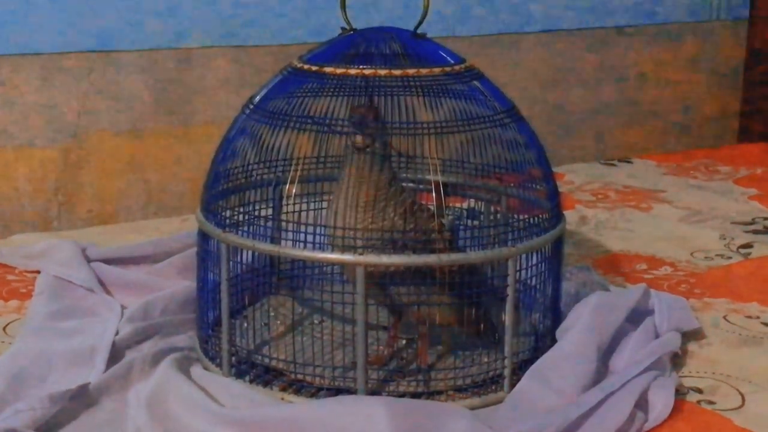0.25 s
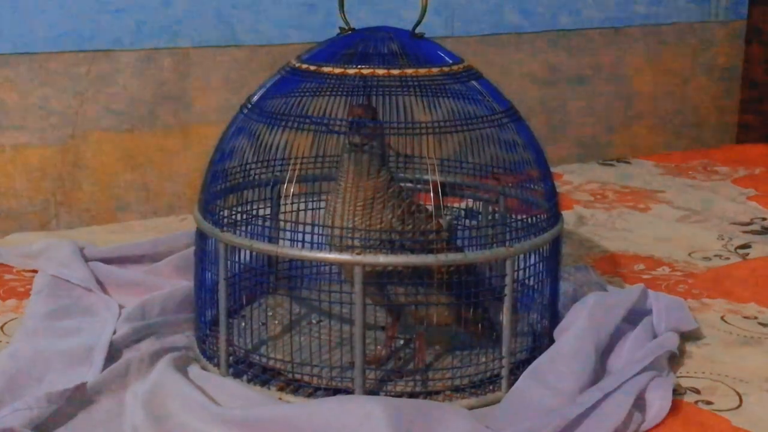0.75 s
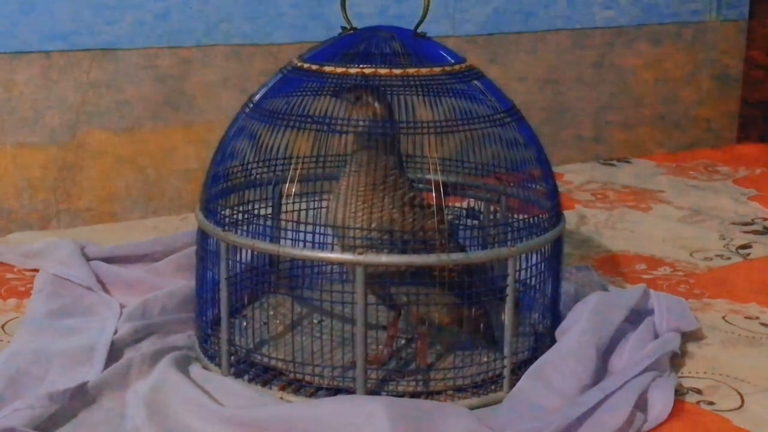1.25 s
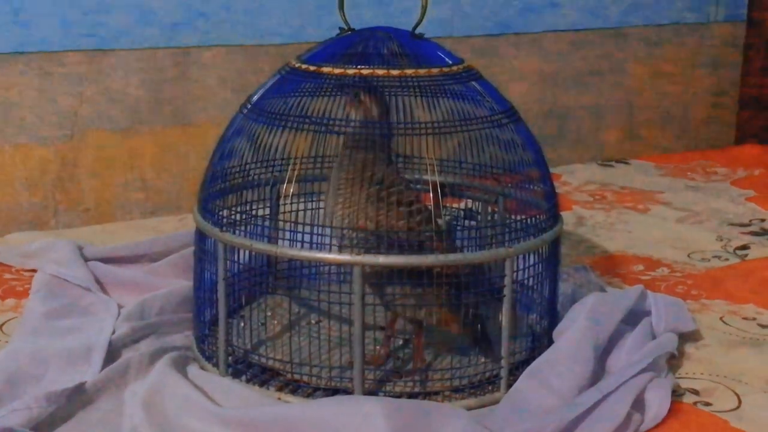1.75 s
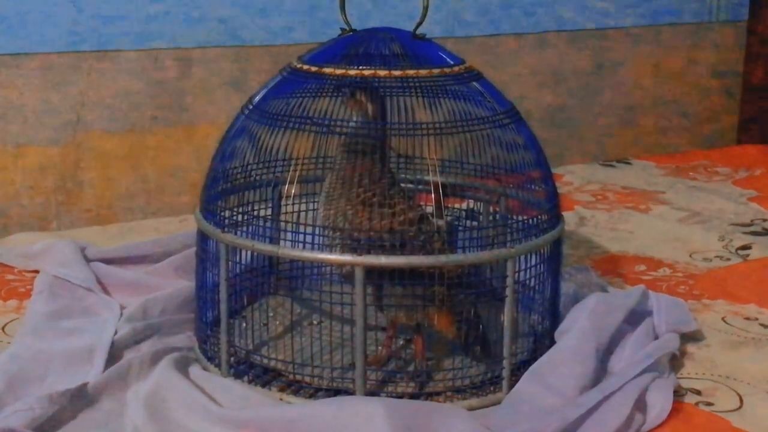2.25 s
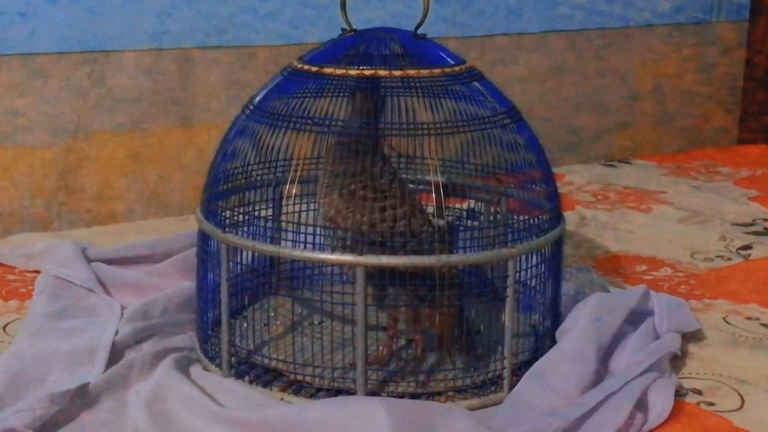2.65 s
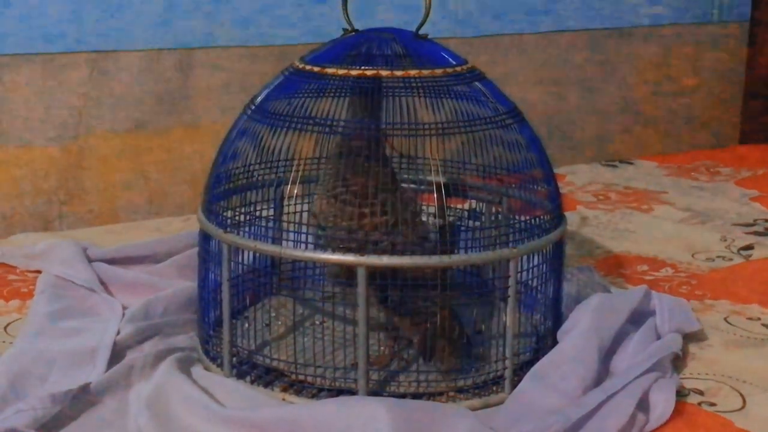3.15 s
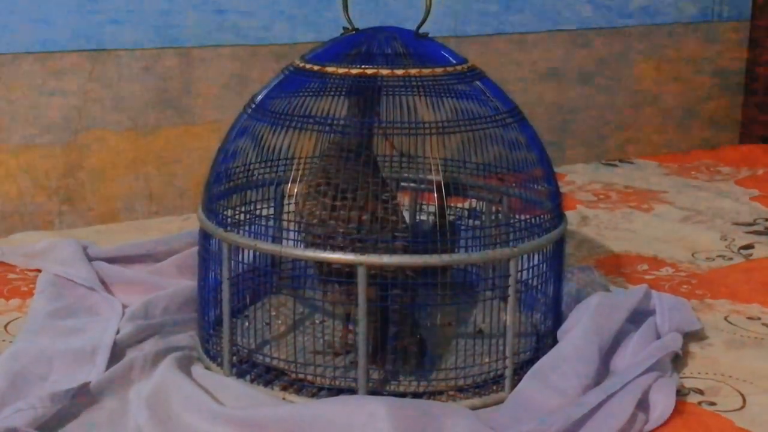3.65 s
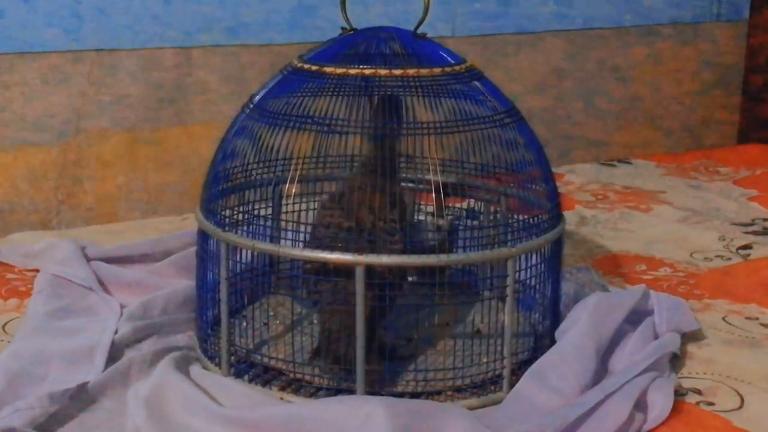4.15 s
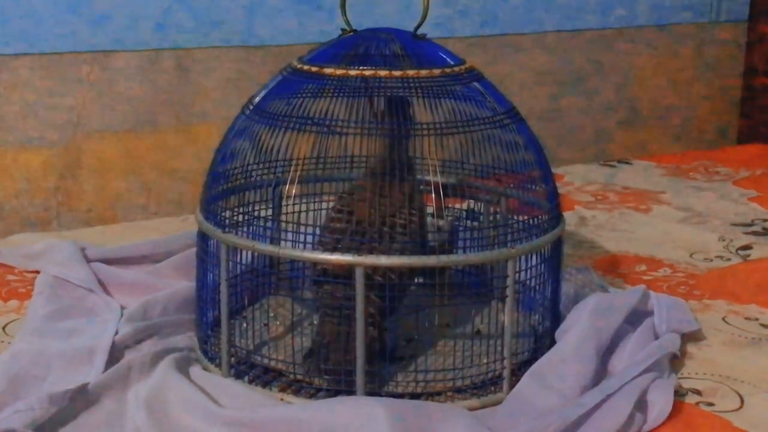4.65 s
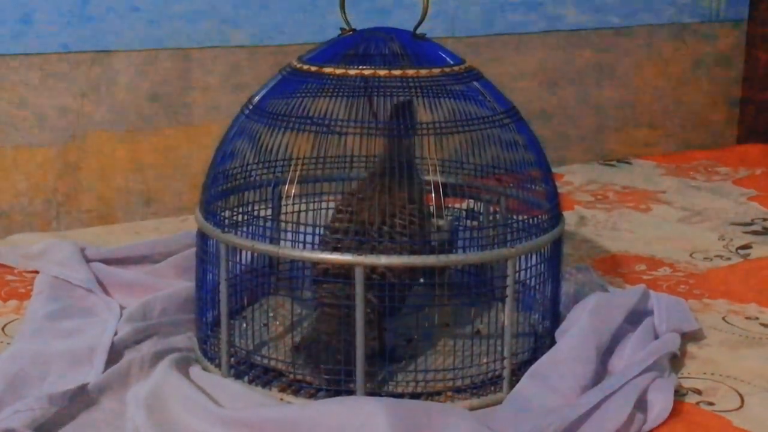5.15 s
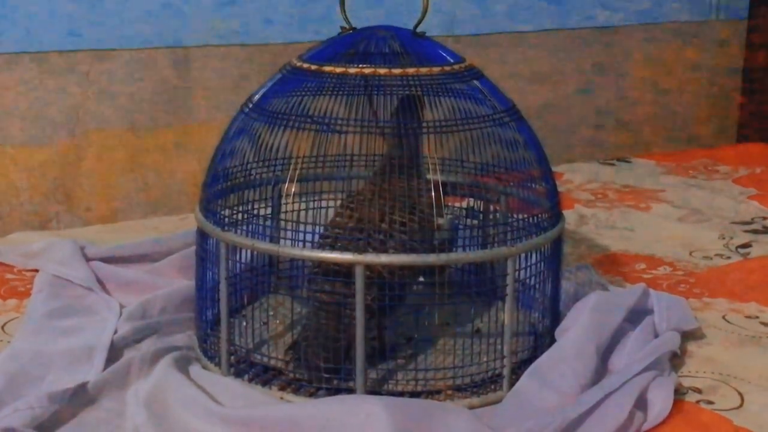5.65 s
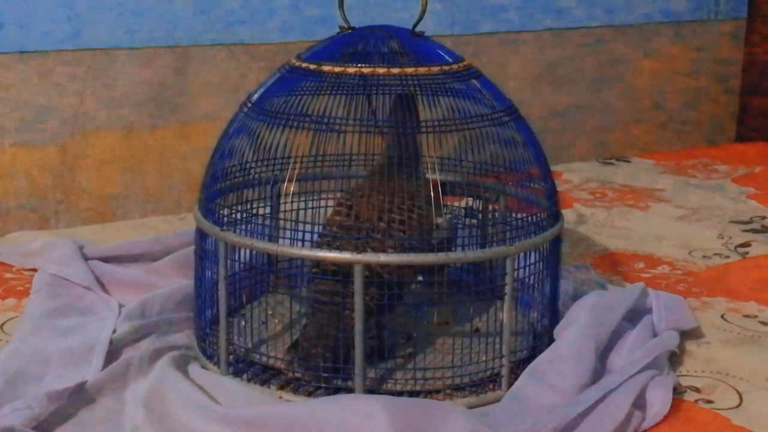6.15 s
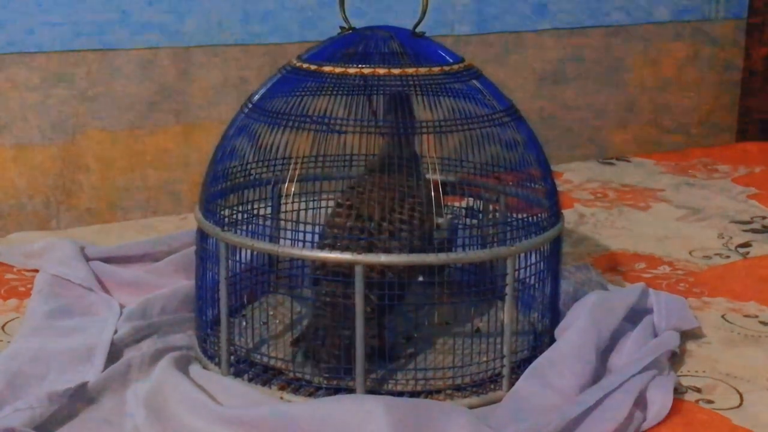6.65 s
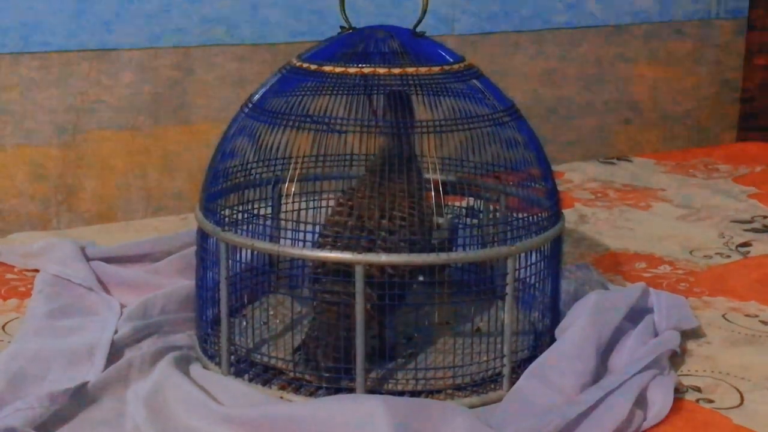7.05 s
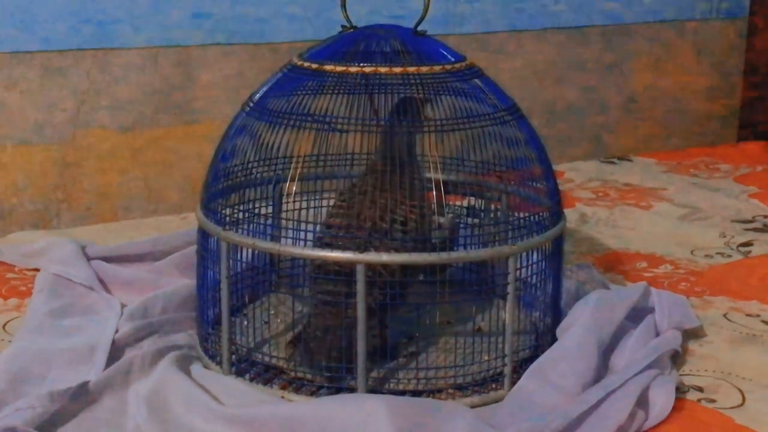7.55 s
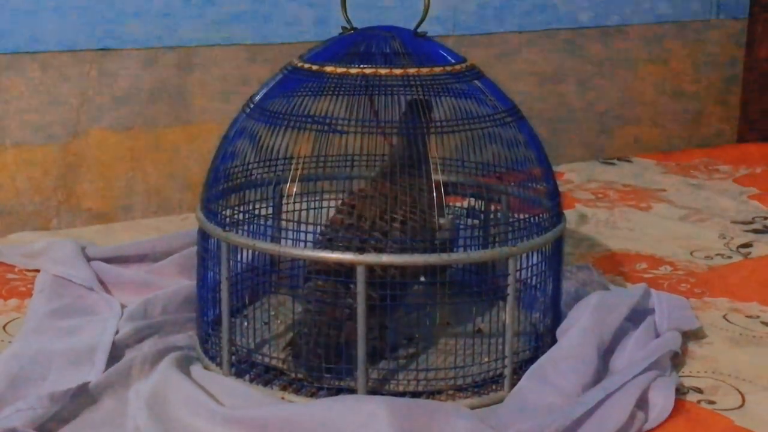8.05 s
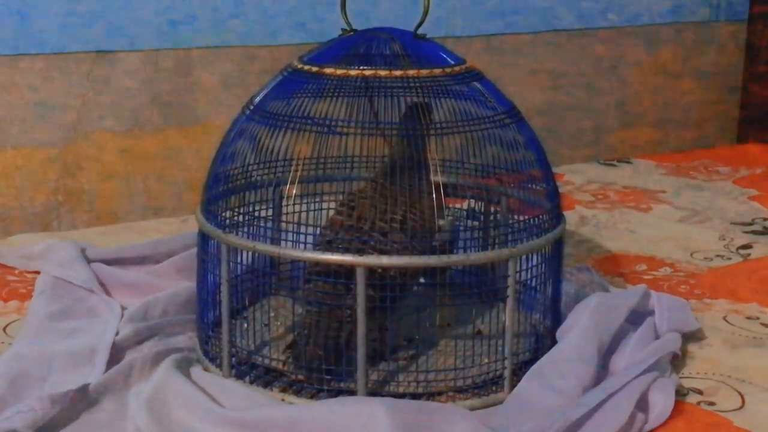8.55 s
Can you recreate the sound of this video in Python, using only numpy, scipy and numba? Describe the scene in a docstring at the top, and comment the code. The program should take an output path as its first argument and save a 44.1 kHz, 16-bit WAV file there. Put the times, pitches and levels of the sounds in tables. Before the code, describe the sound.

Over soft room noise and a faint low hum, a bird in a cage clucks harshly a few times, then starts a run of short, piercing cries, a little under a second apart. Each one rasps, whistles and falls, usually with two clucks after it and sometimes a thin squeak before. The opening is loudest, and the level steps down during the second cry. The calls sound fairly close and ring off hard walls.

```python
"""A caged gray francolin calls in a bare, echoing room, over a faint low hum and soft room air.
First come two harsh clucks with a thin rising squeak between them, and a faint third cluck.
Nine shrill cries follow: each a rasp that breaks into a pure whistle, rasps again and slides down.
The whole sound steps down in level during the second cry. All cries but that one are followed by
two clucks, and a squeak leads into some of them."""
import sys
import numpy as np
from scipy import signal
from scipy.fft import rfft, irfft
from scipy.io import wavfile
from numba import njit

SR = 44100
rng = np.random.default_rng(int(sys.argv[2]) if len(sys.argv) > 2 else 0)


def log_audio(samples):
    """Write samples as a 16-bit WAV file to the path given in sys.argv[1]."""
    # one column per channel
    frames = np.atleast_2d(samples).T
    # limit to full scale, then quantise
    limited = np.clip(frames, -1, 1)
    pcm = np.round(limited * 32767).astype(np.int16)
    wavfile.write(sys.argv[1], SR, pcm)


N = 388962
WHISTLE_DELAY_S, SLIDE_DELAY_S, CRY_LENGTH_S = .037, .081, .156  # from the start of a cry


def undb(db):
    """Decibels to gain."""
    return 10 ** (np.asarray(db) / 20)


def unit(x):
    """Scale to rms 1."""
    return x / np.sqrt(np.mean(x ** 2) + 1e-18)


def on_log(table, hz):
    """Read (Hz, value) points on a log-frequency axis."""
    key, value = np.transpose(table)
    return np.interp(np.log(np.maximum(hz, 1)), np.log(key), value)


def colour(x, spectrum):
    """Filter by (Hz, dB) points."""
    return irfft(rfft(x) * undb(on_log(spectrum, np.fft.rfftfreq(len(x), 1 / SR))), len(x))


def clock(length_s):
    """Sample times of one note."""
    return np.arange(int(length_s * SR)) / SR


def wander(t, rate_hz):
    """Random values joined by lines."""
    return np.interp(t * rate_hz, np.arange(4096), rng.standard_normal(4096))


def swell(t, attack_s):
    """Gain that rises quickly to 1."""
    return 1 - np.exp(-2 * t / attack_s)


def fade(t, edge_s):
    """Soft start and end of a note."""
    return np.sin(np.pi / 2 * np.clip(np.minimum(t, t[-1] - t) / edge_s, 0, 1)) ** 2


def turn(hz):
    """Oscillator phase in radians."""
    return 2 * np.pi * np.cumsum(hz) / SR


def add(track, start_s, x):
    """Mix a note into a track."""
    i = int(start_s * SR)
    track[i:i + len(x)] += x[:len(track) - i]


@njit
def resonate(x, hz, width_hz):
    """State-variable band-pass with a moving centre."""
    y, band_state, low_state = np.empty(len(x)), 0., 0.
    for i in range(len(x)):
        g, damping = np.tan(np.pi * hz[i] / SR), width_hz / hz[i]
        band = (band_state + g * (x[i] - low_state)) / (1 + g * (g + damping))
        band_state, low_state = 2 * band - band_state, low_state + 2 * g * band
        y[i] = damping * band
    return y


def hum():
    """Low tones that waver, slowly swell and sink, and step down once."""
    # Each row: frequency in Hz, relative level in dB.
    partials = [(75.4, -64.5), (129.2, -62), (172.3, -65.5), (366.1, -77.5)]
    # Before and after the step. Each row: time in seconds, level in dB before trim.
    early = [(0.0, -61), (1.39, -50.5), (1.82, -64.5), (2.28, -60.5), (2.42, -58)]
    late = [(2.47, -72.5), (5.31, -70.5), (6.28, -75), (6.98, -69.5), (8.8, -68)]
    trim_db = -2
    t = np.arange(N) / SR
    tones = sum(undb(db + 2 * wander(t, 6)) * np.sin(turn(hz * (1 + .028 * wander(t, 13))))
                for hz, db in partials)
    times_s, level_db = np.transpose(early + late)
    return unit(tones) * undb(np.interp(t, times_s, level_db) + trim_db)


def air():
    """Soft room air: low noise with a drifting level."""
    # Each row: frequency in Hz, relative level in dB.
    spectrum = [(20, -25.5), (45, -10.5), (75, 0), (130, -2.5), (195, -3.5), (270, -11.5), (380, -8.5),
                (600, -18), (1500, -24), (3000, -30), (5000, -35), (7000, -30), (9000, -41), (15000, -32.5)]
    return unit(colour(rng.standard_normal(N), spectrum)) * undb(-54 + wander(np.arange(N) / SR, 5))


def buzz(t, hz, jitter, odd_db, harmonics=26):
    """Uneven syrinx pulses, a puff of air in each; weak odd harmonics give strong-weak pulse pairs."""
    phase = turn(hz * (1 + jitter * wander(t, 904)))
    k = np.arange(1, harmonics + 1)[:, None]
    spread = np.pi * k ** 2 / harmonics  # the windpipe smears each pulse over its cycle
    pulses = np.sum(undb(odd_db * (k % 2)) * np.cos(k * phase + spread), axis=0)
    puffs = (1 + np.cos(phase)) * rng.standard_normal(SR)[:len(t)]
    return unit(pulses * undb(4.4 * wander(t, 350))) + unit(puffs)


def beak(spectrum, opening_db):
    """Tilt a throat spectrum: a wider beak lifts the upper middle and thins the lows."""
    # Each row: frequency in Hz, gain in dB per dB of opening.
    tilt = [(300, -1), (2000, 0.5), (4500, 2.5), (9000, 1.96), (15000, 0.5)]
    return [(hz, db + opening_db * on_log(tilt, hz)) for hz, db in spectrum]


def whistle(t, hz, bright_db, jitter, waver):
    """The syrinx locked on one trembling tone with overtones."""
    # Windpipe and beak response. Each row: overtone frequency in Hz, gain in dB.
    tract = [(3200, -10.5), (4900, -15), (5350, -9), (6200, -23), (7400, -28), (8000, -27.5), (9900, -20.5),
             (10650, -25.5), (11500, -26), (12400, -18.5), (13300, -28.5), (14800, -23.5), (15800, -43)]
    phase = turn(hz * (1 + jitter * wander(t, 1200) + waver * wander(t, 170)))
    overtones = sum(undb(on_log(tract, k * hz)) * np.sin(k * phase) for k in range(2, 7))
    return np.sqrt(2) * (np.sin(phase) + undb(bright_db) * overtones)


def clucks():
    """Hoarse pulses arch in pitch as the throat resonance sinks; midway the voice locks on it."""
    # Each row: start in seconds, length in seconds, throat resonance in Hz, level in dB,
    # relative level of the ringing tone in dB.
    notes = [ (.147, .085, 1723, -21.5, 5), (0.865, .14, 1423, -21, -16), (1.062, 0.041, 1440, -35, -13),
             (1.844, 0.09, 1782, -21, 1), (1.996, 0.066, 1525, -25, 3.5), (3.071, 0.06, 1956, -19, 3),
             (3.212, 0.059, 1800, -21, -0.5), (4.019, 0.068, 1990, -19.5, 3.5),
             (4.168, 0.061, 1658, -23, -.5), (4.759, 0.063, 1952, -19, 3.5), (4.902, 0.068, 1553, -25, -4),
             (5.435, 0.07, 1864, -20.5, 1), (5.576, .065, 1393, -32, 1), (6.136, 0.068, 1833, -20.5, 4.5),
             (6.269, 0.062, 1503, -27.5, -18), (6.836, 0.063, 1783, -20, -1.5),
             (6.967, 0.053, 1590, -27, -4), (7.834, 0.071, 1817, -19.5, 0), (7.984, 0.058, 1548, -28, -17)]
    # Throat with the beak half shut. Each row: frequency in Hz, gain in dB.
    throat = [(250, -32), (480, -10.5), (750, -8.5), (1200, -1), (1750, 1.5), (2400, -1.5), (2900, -6),
              (3800, -5), (5000, -15), (6600, -8), (8000, -16.5), (10000, -15.5), (15000, -13)]
    neutral_hz, shut_db, warm_up_s = 1721, -3.5, 1
    out = np.zeros(N)
    for start_s, length_s, throat_hz, level_db, tone_db in notes:
        t = clock(length_s)
        progress = t / length_s
        past_ring = progress - .54  # 0 where the ringing tone peaks
        pitch_hz = throat_hz * .35 * (1 - .34 * (2 * progress - 1) ** 2)
        # the beak opens wider for higher clucks and as the bird warms up
        opening_db = 12 * np.log2(throat_hz / neutral_hz) + shut_db * np.exp(-start_s / warm_up_s)
        pulses = buzz(t, pitch_hz * (1 + .035 * wander(t, 110)), jitter=.015 + .1 * progress, odd_db=2.1)
        voice = resonate(pulses, throat_hz * (1 - .42 * past_ring), width_hz=900.0)
        voice = colour(voice, beak(throat, opening_db))
        ring_hz = throat_hz * (1 - .27 * past_ring)
        tone = whistle(t, ring_hz, bright_db=-17.5 + 2 * opening_db, jitter=.02, waver=.014)
        ring = unit(tone * undb(7.1 * wander(t, 180))) * undb(tone_db - 12.5 * (2 * past_ring) ** 2)
        note = unit(voice) * undb(3 - 7.5 * progress) + ring
        add(out, start_s, note * undb(level_db) * swell(t, .35 * length_s) * fade(t, .0016))
    return out


def squeaks():
    """A thin, wheezy tone rises towards a ceiling and fades as the bird gathers itself."""
    # Each row: start in seconds, length in seconds, level in dB.
    notes = [(.548, 0.24, -44), (2.315, .11, -42), (3.524, .2, -51.5), (4.95, 0.18, -50),
             (7.339, 0.15, -48)]
    from_hz, ceiling_hz, rise_s, decay_db_per_s = 3350, 4922, .15, 31
    out = np.zeros(N)
    for start_s, length_s, level_db in notes:
        t = clock(length_s)
        hz = ceiling_hz + (from_hz - ceiling_hz) * np.exp(-t / rise_s)
        phase = turn(hz * (1 + .033 * wander(t, 1500) + .02 * wander(t, 70)))
        tone = np.sin(phase) + undb(-27) * np.sin(2 * phase) + undb(-29) * np.sin(3 * phase)
        gain = undb(level_db - decay_db_per_s * t + 2.4 * wander(t, 50))
        add(out, start_s, unit(tone) * gain * fade(t, .039))
    return out


def rasp(whistle_hz, held_s, waver, opening_db):
    """The period doubles twice, so lines stand near quarters of the whistle's pitch."""
    # Throat and open beak. Each row: frequency in Hz, gain in dB.
    throat = [(300, -45), (700, -27), (950, -25), (1270, -15), (1650, -15), (2050, -7.5), (2750, 0),
              (3300, -2), (4100, -1), (4750, -3.5), (5400, -4.5), (6700, -10), (7800, -20.5), (9600, -21.5),
              (10600, -23), (15500, -26.5)]
    throb_hz, peak_s, settle_s = 33.8, .009, .045
    sag_per_s, duck_db, decay_db_per_s = .4, -3, 149.5
    t = clock(.15)
    throb = np.cos(2 * np.pi * throb_hz * (t - peak_s))  # air pressure lifts level and pitch
    bend = 1 + .08 * throb * np.exp(-t / settle_s) - sag_per_s * t
    whistling = np.sin(np.pi * np.clip((t - WHISTLE_DELAY_S) / held_s, 0, 1))
    level_db = 2.5 * throb + duck_db * whistling - decay_db_per_s * np.maximum(t - SLIDE_DELAY_S, 0)
    pitch_hz = whistle_hz / 4 * bend * (1 + 3 * waver * wander(t, 140))
    pulses = buzz(t, pitch_hz, jitter=.015, odd_db=-10.5)
    voice = unit(colour(pulses, beak(throat, opening_db)))
    return voice * undb(level_db + 2 * wander(t, 130)) * swell(t, .008) * fade(t, .0028)


def undertone(whistle_hz, hoarse, waver):
    """The other side of the syrinx holds a tone about an octave lower, flatter when hoarse."""
    t = clock(SLIDE_DELAY_S)
    phase = turn(whistle_hz * (.488 - .032 * hoarse) * (1 + 4.5 * waver * wander(t, 300)))
    return unit(np.sin(phase) + undb(1) * np.sin(3 * phase)) * fade(t, .016)


def held_whistle(hz, held_s, waver):
    """The whistle starts slightly sharp, settles and swells."""
    t = clock(held_s)
    bend = 1 + .022 * np.exp(-t / .0047)
    tone = whistle(t, hz * bend, bright_db=1.6, jitter=.005 + .68 * waver, waver=waver)
    return tone * swell(t, .007) * fade(t, .004)


def slide(hz, length_s, waver):
    """The whistle sinks along an S-curve, fluttering as its overtones fade."""
    from_ratio, towards_ratio, decay_db_per_s, flutter_db = 1.02, .45, 84.5, 3.5
    t = clock(length_s)
    bend = towards_ratio + (from_ratio - towards_ratio) / (1 + (t / length_s / .98) ** 1.5)
    bright_db = 3.4 - 99 * (1 - bend)
    tone = whistle(t, hz * bend, bright_db, jitter=.0046 + 1.1 * waver, waver=1.8 * waver)
    return tone * undb(1.5 - decay_db_per_s * t + flutter_db * wander(t, 190)) * fade(t, .0062)


def cries():
    """Rasp, undertone, whistle and slide; returns the direct sound and what goes to the walls."""
    # Each row: start in seconds, whistle pitch in Hz, whistle length in seconds, level in dB,
    # relative whistle, undertone and room levels in dB, hoarseness from 0 to 1.
    calls = [ (1.554, 2473, 0.051, -9, -1, -25.5, -2.5, 1),
             (2.392, 2655, .031, -6.5, -2.5, -14.5, -6, 0.33),
             (2.804, 2634, 0.02, -7, 3.5, -22.5, -7.5, 0.19),
             (3.719, 2677, 0.027, -8, 2.5, -20.5, -6, 0.04),
             (4.449, 2680, 0.026, -8.5, 3.5, -18.5, -7.5, 0),
             (5.11, 2665, 0.023, -8, 4.5, -22.5, -6.5, 0.01), (5.82, 2647, 0.024, -8, 4.5, -21.5, -6, 0),
             (6.522, 2649, 0.024, -8.5, 5, -23, -6, 0.04), (7.492, 2635, 0.024, -8.5, 4, -22, -5, .05)]
    direct, to_walls = np.zeros(N), np.zeros(N)
    for start_s, hz, held_s, level_db, whistle_db, under_db, room_db, hoarse in calls:
        cry = np.zeros(SR // 2)
        waver = .004 + .011 * hoarse
        add(cry, 0, rasp(hz, held_s, waver, opening_db=-4.5 * hoarse) * undb(-7.5 - 4.5 * hoarse))
        add(cry, 0, undertone(hz, hoarse, waver) * undb(under_db))
        add(cry, WHISTLE_DELAY_S, held_whistle(hz, held_s, waver) * undb(1 + whistle_db))
        slide_at_s = max(SLIDE_DELAY_S, WHISTLE_DELAY_S + held_s)
        add(cry, slide_at_s, slide(hz, CRY_LENGTH_S - slide_at_s, waver))
        add(direct, start_s, cry * undb(level_db))
        add(to_walls, start_s, cry * undb(level_db + room_db))
    return direct, to_walls


def first_echoes(x):
    """Cage, bed and near wall return single echoes that beat against the sliding tone."""
    # Each row: delay in seconds, gain in dB.
    echoes = [(.0043, -23), (0.0104, -16.5), (0.019, -14.5), (.0262, -19.5)]
    out = np.zeros(N)
    for delay_s, db in echoes:
        add(out, delay_s, undb(db) * x)
    return out


def room(x):
    """Dense echoes off plaster walls; the treble dies first."""
    # Each row: band centre in Hz, time to decay by 60 dB in seconds.
    decays = [(300, 1.1), (1000, 0.89), (1700, 0.83), (2500, 0.76), (4000, 0.7), (6000, 0.69),
              (10000, 0.42), (15000, .33)]
    t = clock(1.4)
    noise, hz = rfft(rng.standard_normal(len(t))), np.fft.rfftfreq(len(t), 1 / SR)
    centres_hz = np.array(decays)[:, 0]
    tail = 0
    for (_, t60_s), weights in zip(decays, np.eye(len(decays))):
        band = irfft(noise * on_log(np.c_[centres_hz, weights], hz), len(t))
        tail = tail + band * np.exp(-np.log(1000) * t / t60_s)
    tail = tail * np.clip((t - .006) / .0098, 0, 1)  # travel time to the walls and back
    return signal.fftconvolve(x, tail / np.sqrt(np.sum(tail ** 2)))[:N]


def scene():
    """The bird and its echoes over air and hum, with one step down in level."""
    step_s, step_db = (2.434, 2.446), (-3, -15)
    shrill, to_walls = cries()
    soft = clucks() + squeaks()
    direct = shrill + undb(-.5) * soft
    mix = direct + first_echoes(direct) + room(to_walls + undb(-4.5) * soft) + air()
    level_db = np.interp(np.arange(N) / SR, step_s, step_db)
    return (mix * undb(level_db) + hum())[None]


def record(dry):
    """Round the loudest peaks and cut the top."""
    top_hz = 15800
    rounded = dry / (1 + dry ** 8) ** (1 / 8)
    return signal.sosfilt(signal.ellip(12, .2, 90, top_hz, fs=SR, output="sos"), rounded)


dry = scene()
out = record(dry)
log_audio(out)
```